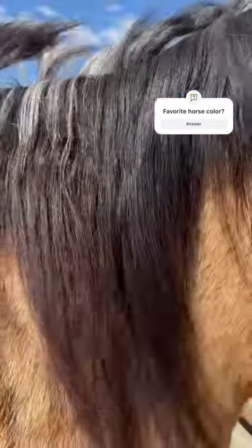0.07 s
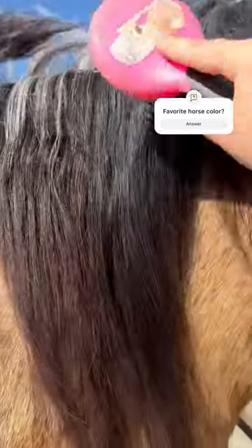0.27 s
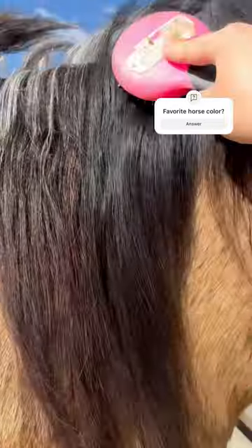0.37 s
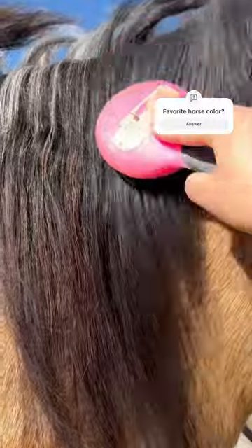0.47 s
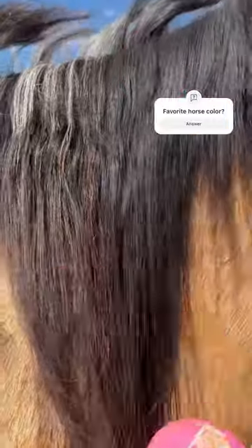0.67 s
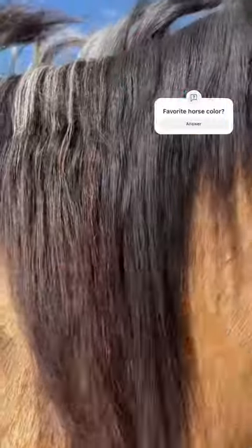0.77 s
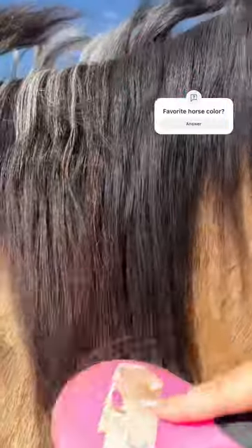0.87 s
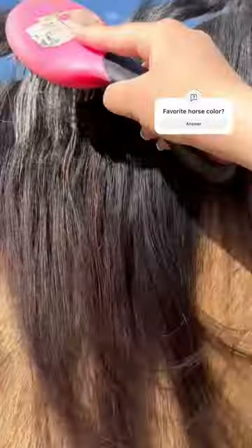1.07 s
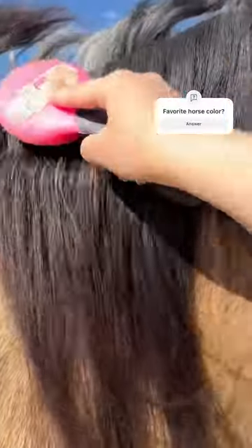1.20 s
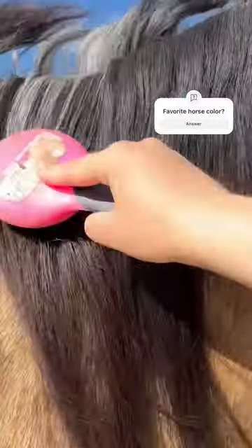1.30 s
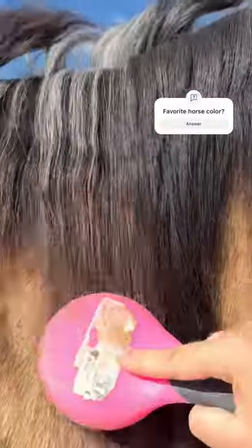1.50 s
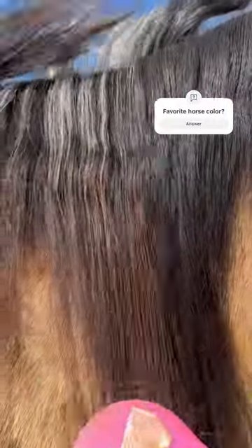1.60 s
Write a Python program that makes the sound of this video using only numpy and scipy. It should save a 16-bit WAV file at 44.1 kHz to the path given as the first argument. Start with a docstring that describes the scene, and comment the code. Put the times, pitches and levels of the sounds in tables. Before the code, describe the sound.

Gusty wind rumbles on the microphone over a brush softly swishing through a horse's mane.

```python
"""Outdoors, close to a small two-port microphone, a brush is drawn twice down a horse's mane.
Friction between bristles and hair makes a soft hiss. Gusty wind rumbles on the microphone as turbulent
pressure at its ports; single eddies sweep over it as short falling whoops, and the strongest gust
builds through separate knocks to a thump. Faint outdoor air lies behind it all."""
import sys
import numpy as np
from scipy import signal
from scipy.fft import rfft, irfft
from scipy.io import wavfile
from scipy.ndimage import uniform_filter1d, minimum_filter1d

SR = 44100
rng = np.random.default_rng(int(sys.argv[2]) if len(sys.argv) > 2 else 0)


def wav_record(signal):
    """Record a signal, one row per channel, as 16-bit PCM in the file named by sys.argv[1]."""
    frames = np.transpose(np.atleast_2d(signal))
    bounded = np.clip(frames, -1, 1)
    # unit amplitude maps onto the largest positive 16-bit level
    quanta = np.round(bounded * 32767).astype(np.int16)
    wavfile.write(sys.argv[1], SR, quanta)


N = 72765
T, HZ = np.arange(N) / SR, np.fft.rfftfreq(N, 1 / SR)
SPLIT = np.array([[.5], [-.5]])  # shares a level or phase difference between left and right

# Likeness of the wind at the two ports. Each row: frequency in Hz, correlation.
WIND_COHERENCE = [(420, 1), (600, .996), (800, .97), (1300, .8), (2500, .6), (8000, .4)]


def brush():
    """Sliding friction: bristles slip over countless hairs, and the hiss follows the stroke's speed."""
    # Each row: start, rise, hold and release in seconds, level in dB.
    strokes = [(0.362, 0.17, 0.097, 0.21, -57.5), (1.146, 0.22, 0.03, 0.57, -60)]
    # Loose hair rustles between the strokes: centre and half-length in seconds, level in dB.
    rustle = (.87, .085, -71.5)
    # Each row: centre and half-length in seconds, level in dB, pitch and width in Hz, slide in Hz/s.
    resonances = [(.635, .085, -58.5, 2190, 280, -800), (.62, .085, -64.5, 3100, 400, 1200),
                  (1.53, .16, -64.5, 2100, 1100, 1000), (1.48, .12, -65.5, 2850, 450, 2600)]
    # Each row: frequency in Hz, relative spectral density in dB.
    hair_spectrum = [(300, -25.5), (1300, 6), (2000, 2.5), (2550, 3.5), (3050, -3.5), (4200, 0.5),
                     (5300, 3), (6500, -2), (10000, -4), (15500, -8.5)]
    speed = swell(*rustle)
    for start, rise, hold, release, db in strokes:
        ramp = np.interp(T, np.cumsum([start, rise, hold, release]), [0, 1, 1, 0])
        speed += amp(db) * np.sin(np.pi / 2 * ramp) ** 2
    ring = sum(bristle_resonance(*row) for row in resonances)
    grain = unit_rms(amp(drift(hz=402)))  # 1 dB rms of fine roughness
    hiss = speed * friction_noise(amp(per_bin(hair_spectrum)))
    return grain * (hiss + ring)


def bristle_resonance(centre, half, db, hz, width, hz_per_s):
    """Resonance: the loaded bristles favour one band of noise, which slides as the brush travels."""
    band = 1 / (1 + ((HZ - hz) / (width / 2)) ** 2)
    ring = signal.hilbert(friction_noise(band))
    slide = np.exp(1j * np.pi * hz_per_s * (T - centre) ** 2)
    return swell(centre, half, db) * (ring * slide).real


def friction_noise(gain):
    """Path difference: the noise of the brush reaches the left port first and so leads in phase."""
    # Each row: frequency in Hz, correlation between the ports.
    coherence = [(1000, 1), (2500, 0.6), (4500, 0.72), (6000, 1), (15000, 1)]
    # Each row: frequency in Hz, lead of the left port in radians.
    lead = [(1200, 2), (2200, 0.34), (2800, 4.2), (3700, 4.4), (5000, 1.1), (6050, 3.3), (8100, 6.27),
            (10300, 9.5), (12400, 13), (14600, 15.5)]
    spectra = noise_pair(coherence) * gain * np.exp(1j * SPLIT * per_bin(lead))
    return unit_rms(irfft(spectra, N))


def wind():
    """Turbulent pressure at the ports: the harder the gust, the higher its spectrum reaches."""
    # Each row: time in seconds, then levels of rumble, buffeting and flutter in dB.
    gusts = [(0, -21, -42, -55), (0.028, -44, -34, -53), (0.053, -27, -29, -48), (0.094, -36, -27.5, -49),
             (0.138, -41, -44.5, -83.5), (0.21, -36, -53, -84), (0.28, -43.5, -49, -70),
             (0.318, -31.5, -32.5, -62), (0.345, -25.5, -31, -57), (0.369, -36.5, -27.5, -69),
             (0.411, -33, -35.5, -53), (0.435, -28, -32.5, -68), (0.449, -30, -24, -60),
             (0.49, -29, -33, -51), (0.516, -22, -37, -51.5), (0.542, -49, -42, -66),
             (0.564, -32, -29, -57), (0.604, -31, -32.5, -54), (0.64, -27, -43, -59),
             (0.703, -26, -27.5, -41), (0.73, -32.5, -29.5, -39.5), (0.77, -20, -33, -40),
             (0.805, -22, -29, -16), (0.829, -17, -14.5, -34), (0.865, -21.5, -31.5, -27.5),
             (0.88, -25.5, -23.5, -32.5), (0.9, -30, -21.5, -40), (0.91, -41.5, -26, -26),
             (0.938, -21, -23, -34.5), (0.969, -36, -37.5, -48.5), (1.03, -29, -39, -57.5),
             (1.08, -34, -38.5, -57.5), (1.111, -42.5, -57.5, -71), (1.135, -39.5, -40, -48),
             (1.18, -43.5, -45, -80), (1.219, -39.5, -50, -71), (1.256, -30.5, -28, -45),
             (1.284, -25.5, -36.5, -37.5), (1.318, -27.5, -36.5, -54.5), (1.371, -30.5, -29, -50.5),
             (1.402, -35, -45, -59.5), (1.424, -39.5, -31, -52), (1.459, -40, -52, -82),
             (1.52, -38, -49.5, -64.5), (1.559, -35, -36, -52), (1.616, -33, -33.5, -48.5),
             (1.645, -57, -39, -59)]
    # The strongest gusts rasp at the ports. Each row: time in seconds, level in dB.
    rasp_levels = [(.03, -89), (.055, -49), (.08, -91), (0.656, -79), (.671, -43.5), (.69, -85),
                   (.733, -49), (.77, -83), (.81, -33.5), (.82, -57), (.84, -43), (.88, -56), (.895, -38.5),
                   (.91, -59), (.925, -39.5), (.945, -65), (1.0, -76.5)]
    # Spectra of the four layers. Each row: frequency in Hz, relative density in dB.
    rumble_spectrum = [(10, -32.5), (25, -25), (42, -1.5), (62, 1.5), (80, 2.5), (115, -3), (150, -9.5),
                       (230, -46.5), (650, -110)]
    buffet_spectrum = [(60, -39.5), (105, 0), (140, 4), (270, -2), (380, -6.5), (480, -14), (620, -34.5),
                       (1000, -73.5), (2000, -100)]
    flutter_spectrum = [(200, -46), (400, 0.5), (520, -2.5), (660, -4.5), (800, -9.5), (1000, -15),
                        (1200, -28), (1700, -35), (5000, -93.5)]
    rasp_spectrum = [(500, -30), (900, -6.5), (1220, 4.5), (1450, -6), (1750, -12), (1920, -17.5),
                     (2150, -22), (2600, -33), (4000, -42.5), (16000, -73.5)]
    times, rumble_db, buffet_db, flutter_db = np.transpose(gusts)
    wander = drift(hz=81.5)
    fast_wander = unit_rms(wander - uniform_filter1d(wander, size=1300))
    flicker_db = 7 * np.tanh(fast_wander)
    rumble = envelope(times, rumble_db) * turbulence(rumble_spectrum, span=900)
    buffet = envelope(times, buffet_db) * turbulence(buffet_spectrum, span=400)
    flutter = envelope(times, flutter_db) * turbulence(flutter_spectrum, span=250)
    rasp = envelope(*np.transpose(rasp_levels)) * turbulence(rasp_spectrum, span=200)
    buffet *= unit_rms(amp(0.43 * flicker_db))  # the buffeting flickers less than the treble
    return rumble + buffet + unit_rms(amp(flicker_db)) * (flutter + rasp)


def turbulence(spectrum, span, steadiness=0.9):
    """Random pressure fluctuation, its chance swells over `span` samples partly evened out."""
    noise = unit_rms(irfft(noise_pair(WIND_COHERENCE) * amp(per_bin(spectrum)) * port_balance(), N))
    power = (noise ** 2).mean(0)
    for _ in range(3):
        power = uniform_filter1d(power, span)
    return unit_rms(noise / (abs(power) + 1e-6) ** (steadiness / 2))


def port_balance():
    """Level difference between the ports: the wind's treble is stronger on the right."""
    # Each row: frequency in Hz, left minus right in dB.
    balance = [(520, 0), (750, -.6), (1000, -2), (1400, -5), (2200, -2), (4000, 0)]
    return amp(SPLIT * per_bin(balance))


def eddies():
    """Convected vortices: each makes a few smooth pressure swings that slow down as it passes."""
    # Each row: time of the peak in seconds, level in dB, pitch there in Hz, glide constant in seconds.
    passages = [(0.237, -13.5, 205, 0.0091), (.395, -19, 171, 0.013), (.463, -18, 293, 0.0058),
                (0.473, -14, 327, 0.0073), (0.5, -20.5, 180, 0.011), (.511, -21.5, 230, .008),
                (0.678, -14, 272.8, .014), (0.691, -14, 105, 0.0031), (0.765, -19, 354.4, 0.013),
                (0.775, -21, 100, 0.028), (.806, -17, 325, 0.01), (0.82, -15, 85, .012),
                (0.849, -5.5, 86.2, 0.0053), (.944, -20, 111, 0.013), (1.613, -24.5, 125, 0.011)]
    low_hz, top_hz, roughness = 44.6, 509, 0.091
    pressure = np.zeros(N)
    for peak, db, hz, glide in passages:
        age = np.clip(T - peak, -.1, .2) / glide
        pitch = np.minimum(low_hz + (hz - low_hz) * np.exp(-age), top_hz)
        cycles = np.cumsum(pitch * (1 + roughness * drift(hz=360))) / SR
        cycles -= np.interp(peak, T, cycles)  # a crest falls on the peak
        rise, fall = np.exp(-abs(age / 0.56) ** 1.34), 1 / np.cosh(age)
        pressure += amp(db) * np.where(age < 0, rise, fall) * np.cos(2 * np.pi * cycles)
    return pressure


def puffs():
    """Pressure transients: a few milliseconds of band-limited turbulence knock on the ports."""
    # Each row: time in seconds, level in dB, upper band edge in Hz.
    knocks = [(0.234, -33.5, 643), (0.338, -35, 482), (.387, -31.5, 520), (0.459, -27, 540),
              (0.471, -20.5, 622), (.506, -26.5, 623), (0.603, -35.5, 497), (0.669, -15, 602),
              (0.734, -30, 990), (.782, -21, 594), (0.794, -21, 666), (.804, -15, 850), (0.811, -11, 678),
              (.825, -20, 623), (0.852, -25, 701), (0.869, -29, 742), (0.894, -20.5, 881),
              (0.92, -19.5, 1038), (0.933, -24.5, 647), (1.023, -41.5, 646)]
    low_edge_hz, steepness = 290, 14.9
    pressure = np.zeros((2, N))
    for centre, db, edge_hz in knocks:
        window = swell(centre, half=0.0032, db=0)
        band = 1 / np.sqrt((1 + (low_edge_hz / (HZ + 1)) ** 6) * (1 + (HZ / edge_hz) ** steepness))
        burst = window * irfft(noise_pair(WIND_COHERENCE), N)
        knock = irfft(rfft(burst) * band * port_balance(), N)
        pressure += amp(db) * unit_rms(knock) * np.sqrt(np.mean(window ** 2))
    return pressure


def thump():
    """Group delay: the gust's peak slaps the ports three times, each a dull click whose bass trails."""
    # Each row: time in seconds, relative level in dB.
    slaps = [(0.8326, 19), (0.8339, 29), (0.8371, 16.5)]
    # Each row: frequency in Hz, gain in dB.
    slap_spectrum = [(60, -20), (250, 4.5), (450, 11), (750, -4), (1000, -2), (1230, -15.5), (1450, -8),
                     (1750, -17), (2200, -22.5), (2600, -35), (3700, -42.5), (5200, -47.5), (6500, -87),
                     (16000, -82)]
    # Each row: frequency in Hz, lead of the left port in radians.
    lead = [(480, 0), (900, .15), (1400, .5), (2200, 1.6), (5000, 1.6)]
    bass_delay_s, bass_hz = 0.0017, 825
    clicks = sum(amp(db) * np.exp(-2j * np.pi * HZ * time) for time, db in slaps)
    bass_lag = 2 * np.pi * bass_delay_s * bass_hz * (np.exp(-HZ / bass_hz) - 1)
    phase = bass_lag + SPLIT * per_bin(lead)
    return irfft(clicks * amp(per_bin(slap_spectrum)) * port_balance() * np.exp(1j * phase), N)


def air():
    """Ambient noise: a faint, steady outdoor floor."""
    # Each row: frequency in Hz, relative spectral density in dB.
    air_spectrum = [(100, -2.5), (600, -2.5), (1100, -13), (1500, 3), (2100, -8), (2700, -21.5),
                    (4800, -22), (6500, -30.5), (15000, -39.5)]
    noise = irfft(noise_pair(WIND_COHERENCE) * amp(per_bin(air_spectrum)), N)
    return amp(-68.5) * unit_rms(noise)


def noise_pair(coherence):
    """Partial coherence: white spectra for two ports that share part of their noise."""
    common, separate = rfft(rng.standard_normal((2, N)))
    share = np.clip(per_bin(coherence), 0, 1)
    return np.array([common, share * common + np.sqrt(1 - share ** 2) * separate])


def drift(hz):
    """Low-pass noise: random motion up to a given rate, rms 1."""
    return unit_rms(irfft(rfft(rng.standard_normal(N)) / (1 + (HZ / hz) ** 4), N))


def swell(centre, half, db):
    """A Gaussian envelope, down to 1/e at `half` seconds from its centre."""
    return amp(db) * np.exp(-((T - centre) / half) ** 2)


def envelope(times, db):
    """A level curve as a gain with rounded corners."""
    return uniform_filter1d(amp(np.interp(T, times, db)), size=128)


def per_bin(points):
    """Interpolates rows of frequency and value on a logarithmic frequency axis."""
    hz, value = np.transpose(points)
    return np.interp(np.log(HZ + 1), np.log(hz + 1), value)


def amp(db):
    """Decibels to amplitude ratio."""
    return 10 ** (np.asarray(db) / 20)


def unit_rms(x):
    """Normalises to rms 1."""
    return x / np.sqrt(np.mean(x ** 2) + 1e-20)


def scene():
    """Superposition: brush, wind and background add at the two ports."""
    return brush() + wind() + eddies() + puffs() + thump() + air()


def record(dry):
    """Peak limiting holds the thump under full scale; a low-pass filter then limits the band."""
    ceiling, reaction_s, cutoff_hz = .88, .0015, 15760
    span = round(reaction_s * SR)
    gain = minimum_filter1d(ceiling / np.maximum(abs(dry).max(0), ceiling), 2 * span)
    limited = dry * uniform_filter1d(uniform_filter1d(gain, span), span)
    lowpass = signal.firwin(511, cutoff_hz, window=("kaiser", 9), fs=SR)
    return signal.oaconvolve(limited, lowpass[None], "same")


dry = scene()
out = record(dry)
wav_record(out)
```